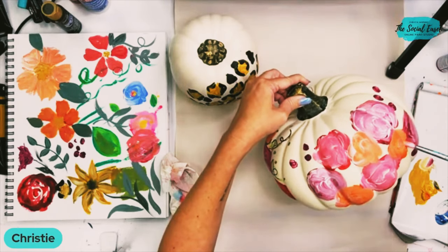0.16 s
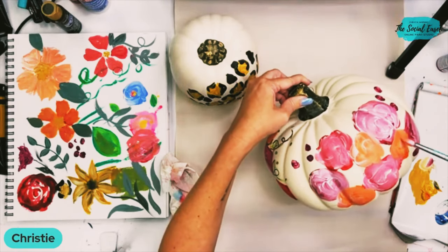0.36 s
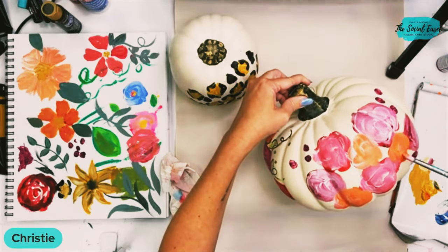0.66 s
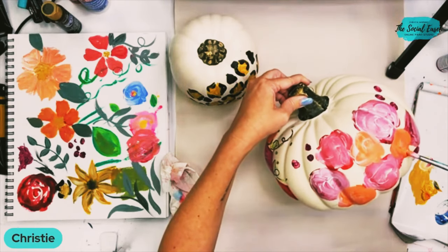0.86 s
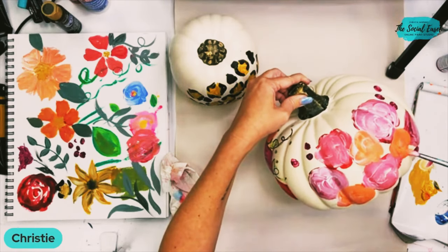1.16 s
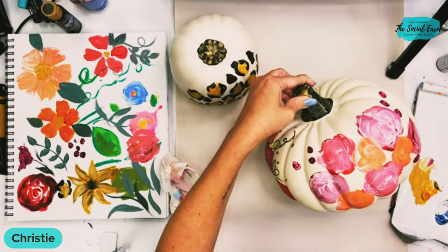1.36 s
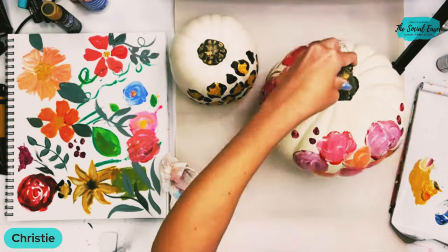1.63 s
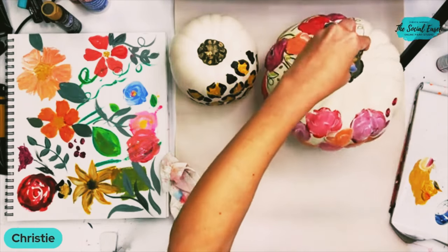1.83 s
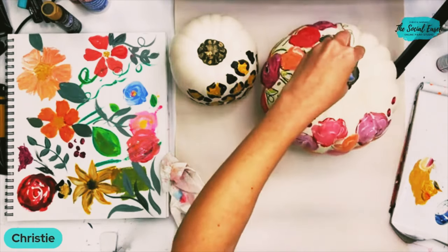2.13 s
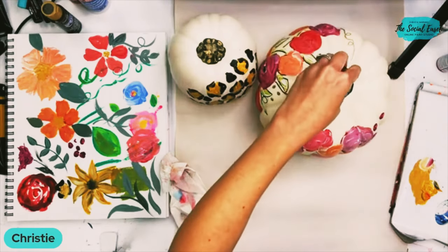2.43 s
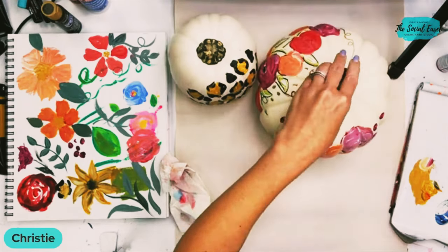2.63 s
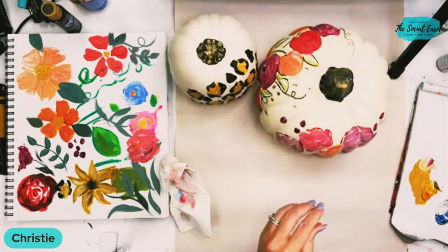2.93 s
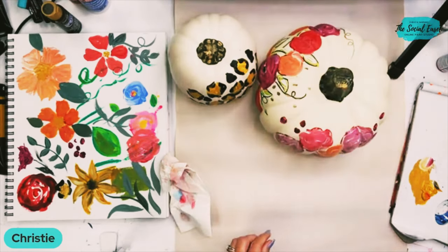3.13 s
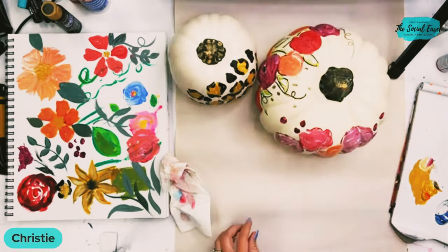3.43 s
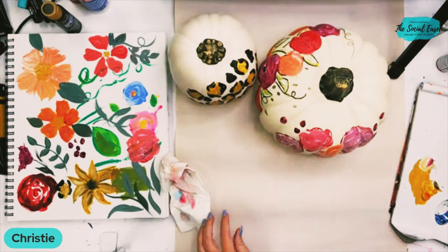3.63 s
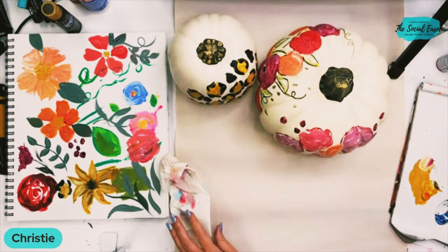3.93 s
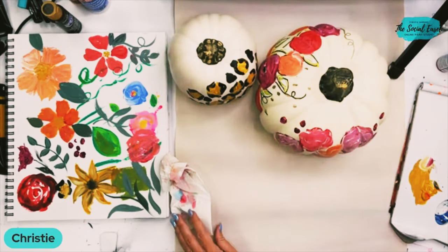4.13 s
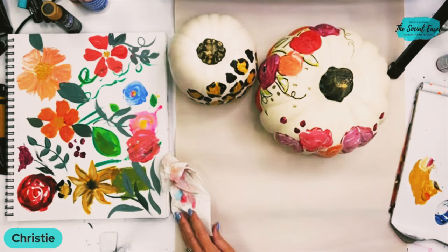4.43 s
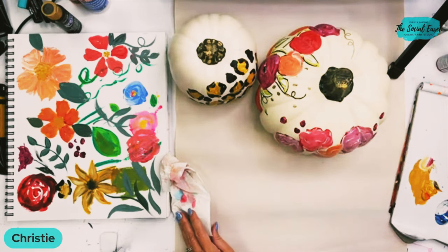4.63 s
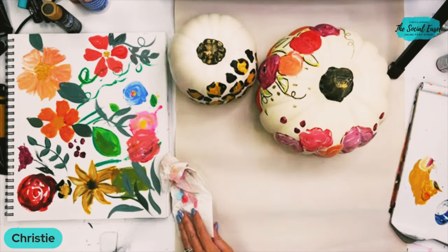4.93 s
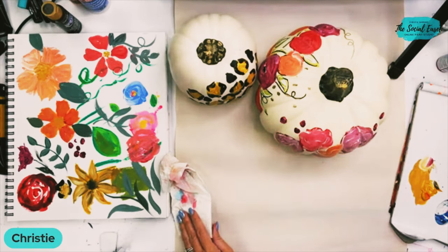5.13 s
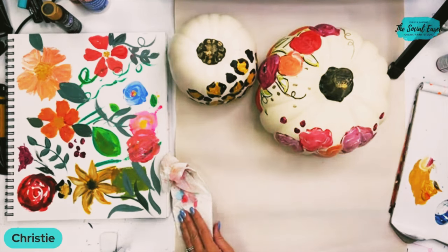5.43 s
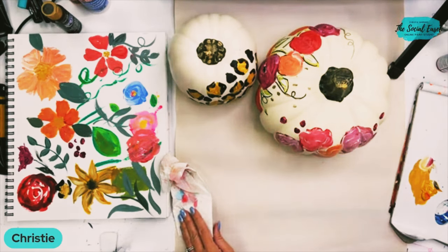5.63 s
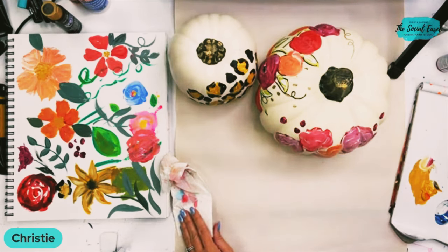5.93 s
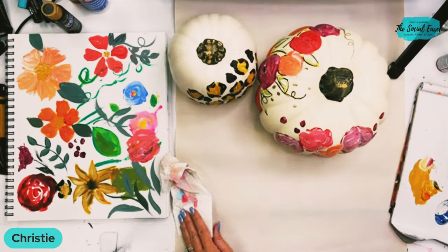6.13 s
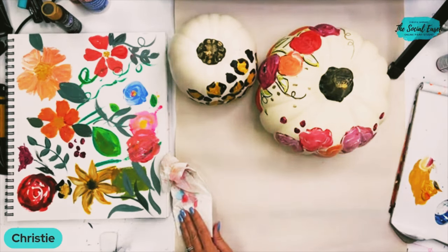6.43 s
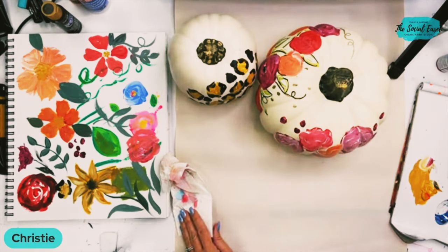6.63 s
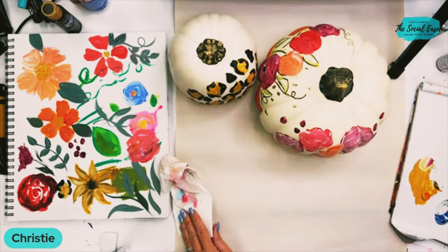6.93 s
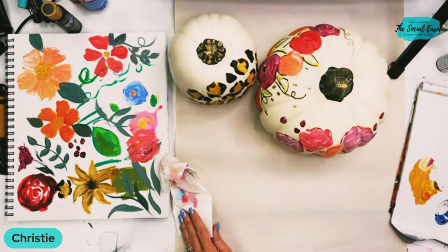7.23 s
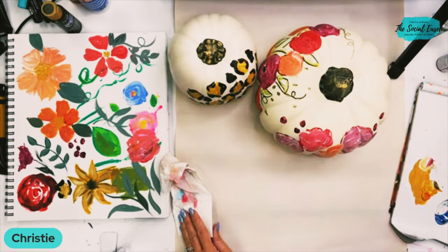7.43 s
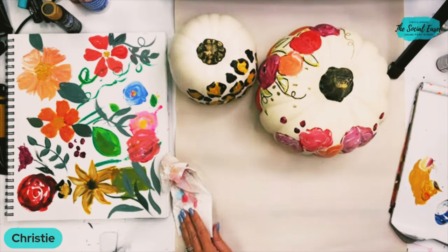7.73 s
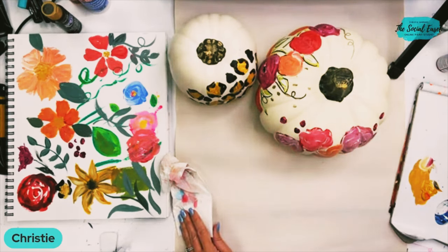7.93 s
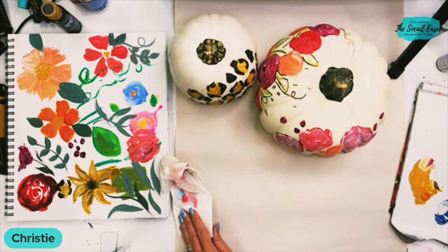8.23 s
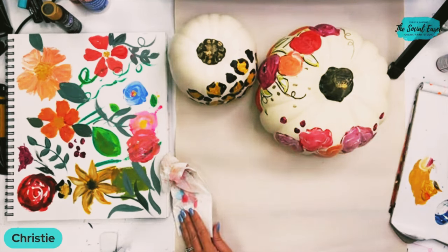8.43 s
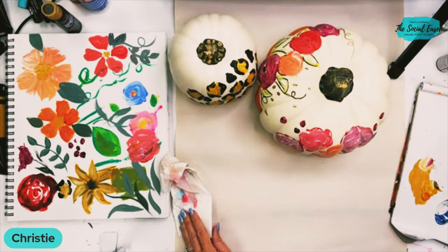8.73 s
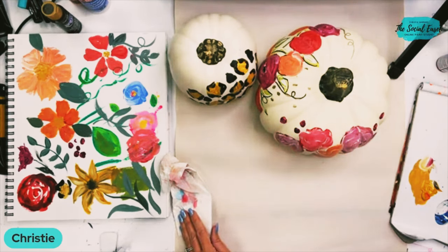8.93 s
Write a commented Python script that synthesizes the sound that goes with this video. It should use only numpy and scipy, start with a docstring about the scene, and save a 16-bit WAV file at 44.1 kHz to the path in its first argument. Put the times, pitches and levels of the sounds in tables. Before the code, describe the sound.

Close in a small quiet room with faint appliance hum, a short dry scrape comes first, then a hollow craft pumpkin rubs over paper and knocks on the table. After a brief gap, a paintbrush is rinsed in a glass jar: quick bright clinks, bubbly plops and light sloshing, busiest at first, then sparser taps until the end.

```python
"""A low appliance hum and a thin lamp whine sit in quiet room air: slowly wavering sines over shaped noise.
A short scrape on a hard edge follows, then a hollow craft pumpkin slides over paper and knocks on a table:
rough filtered noise and decaying shell modes. Then a paintbrush is swished in a water-filled glass jar:
its ferrule clinks as chattering noise bursts, bubbles plop as damped tones, water sloshes as lumpy noise,
and the wet wall sings in fluttering notes. A small room answers with decaying noise tails."""
import sys
import numpy as np
from scipy import signal
from scipy.fft import rfft, irfft, next_fast_len
from scipy.io import wavfile
from scipy.ndimage import uniform_filter1d, map_coordinates

SR = 44100
rng = np.random.default_rng(int(sys.argv[2]) if len(sys.argv) > 2 else 0)


def unload_audio(sound):
    """Save the sound as a 16-bit wav file, at the path given as the first command line argument."""
    columns = np.transpose(np.atleast_2d(sound))
    # keep every value between -1 and 1, then stretch to whole-number steps
    steps = np.round(np.clip(columns, -1, 1) * 32767)
    wavfile.write(sys.argv[1], SR, steps.astype(np.int16))


N = 400428  # length in samples


def amp(db):
    """Decibels to gain."""
    return 10 ** (np.asarray(db) / 20)


def unit(x):
    """Scaled to rms 1."""
    return x / np.sqrt(np.mean(x ** 2) + 1e-20)


def along(points, hz):
    """Values of (freq_hz, value) points, read on a log frequency axis."""
    f, v = np.transpose(points)
    return np.interp(np.log(hz + 1), np.log(f + 1), v)


def curves(rows):
    """One value per sample for each dB column, -120 dB outside the table."""
    s, *cols = np.transpose(rows)
    return [np.interp(np.arange(N) / SR, s, c, -120, -120) for c in cols]


def wobble(rate):
    """A smooth random curve, rate knots a second."""
    return map_coordinates(rng.standard_normal(int(N * rate / SR) + 4), [np.arange(N) * rate / SR])


def filtered(x, response):
    """x shaped by a complex response of frequency."""
    m = next_fast_len(len(x) + len(x) // 16 + 2048)  # spare room for ringing
    return irfft(rfft(x, m) * response(np.fft.rfftfreq(m, 1 / SR)), m)[:len(x)]


def band(hz, width_hz):
    """A causal resonance."""
    return lambda f: 1j * f * width_hz / (hz * hz - f * f + 1j * f * width_hz)


def steep(hz, width_hz):
    """A resonance with fast-falling skirts."""
    return lambda f: band(hz, width_hz)(f) * band(hz, 3 * width_hz)(f)


def puff(size, hz, width_hz):
    """Noise in a steep band, rms 1."""
    return unit(filtered(rng.standard_normal(size), steep(hz, width_hz)))


def add(track, s, sound):
    """Mix a sound in at s seconds."""
    part = track[round(s * SR):][:len(sound)]
    part += sound[:len(part)]


def ringing(modes, t, spread_db):
    """Decaying modes of a struck body, their strengths scattered by spread_db."""
    return sum(amp(db + rng.normal(0, spread_db) - 60 * t / t60) * np.sin(2 * np.pi * hz * t)
               for hz, db, t60 in modes)


def stirred(over_db, t60):
    """A gain of one plus a dying burst after every contact, over_db above the contact's level."""
    t, out = np.arange(SR // 2) / SR, np.ones(N)
    for s, db, *_ in BRUSH_TAPS:
        add(out, s, amp(db + over_db - 60 * t / t60))
    return out


# Colour of the room air: freq_hz [Hz], gain_db [dB, relative]
AIR_COLOUR = [(15, -37.5), (25, -12), (82, -21), (96, -14.5), (118, -4.5), (146, -10), (232, -14.5),
              (343, -16.5), (411, -22.5), (622, -26), (895, -27.5), (1320, -33), (7690, -50), (10200, -44),
              (12300, -71.5), (16000, -103), (22000, -120)]
# Appliance hum, its overtones and the lamp whine: pitch_hz [Hz], level_db [dB rms]
HUM_TONES = [(58.3, -81), (116.54, -63), (120.01, -66), (240, -69), (640.6, -77), (10055, -83.5)]
AIR_DB = -60
BEAT_LEAD_S = .053  # before drift, the tones' phases line up this long before the start


def background():
    """Room air, two close hums that beat, their overtones and a thin whine, all gently wavering."""
    t = np.arange(N) / SR + BEAT_LEAD_S
    air = unit(filtered(rng.standard_normal(N), lambda f: amp(along(AIR_COLOUR, f))))
    tones = sum(amp(db + 3 + 0.61 * wobble(1.6)) * np.sin(2 * np.pi * hz * t + 0.27 * wobble(2.4))
                for hz, db in HUM_TONES)  # +3 dB turns rms into sine peak
    return amp(AIR_DB + 0.18 * wobble(2.5)) * air + tones


# Decay of the small room: freq_hz [Hz], t60_s [s]
ROOM_DECAY = [(300, 0.27), (2000, 0.29), (6000, 0.18), (11000, 0.22)]


def room(x):
    """Reflections arrive after a short gap, each frequency dying at its own speed."""
    out, step = np.zeros(N), SR // 3
    for start in range(0, N, step):  # a new tail every third of a second
        hz, t, z = signal.stft(rng.standard_normal(SR // 3), SR, nperseg=256)
        decay = amp(-60 * t / along(ROOM_DECAY, hz)[:, None])
        tail = signal.istft(z * decay, SR, nperseg=256)[1]
        reflections = signal.fftconvolve(x[start:start + step], tail / np.linalg.norm(tail))
        add(out, start / SR + .015, reflections)
    return out


# Stroke of the short scrape: time_s [s], level_db [dB rms]
SCRAPE_STROKE = [(1.35, -72), (1.37, -61), (1.373, -56.5), (1.385, -49.5), (1.415, -53), (1.432, -61),
                 (1.445, -77)]
# Resonances of the hard edge: pitch_hz [Hz], width_hz [Hz], gain_db [dB, relative]
EDGE_MODES = [(2360, 300, -4.5), (3260, 280, -1), (4300, 1200, -3.5), (6600, 1000, -6), (8800, 2000, -21)]


def scrape():
    """A catch on a hard edge, then coarse grains through its resonances."""
    grains = rng.standard_normal(N) * amp(4 * wobble(400))
    edge = lambda f: sum(amp(db) * steep(hz, w)(f) for hz, w, db in EDGE_MODES)
    out = amp(curves(SCRAPE_STROKE)[0]) * unit(filtered(grains, edge))
    t = np.arange(SR // 30) / SR
    catch = ringing([(hz, 0, .025) for hz, *_ in EDGE_MODES[:2]], t, spread_db=6)
    add(out, SCRAPE_STROKE[2][0], amp(-44) * catch)
    return out


# Pumpkin and hand on the table: start_s [s], level_db [dB]; within each knock shell_db [dB],
# note_hz [Hz], note_db [dB], click_db [dB, before a 5 dB cut], click_hz [Hz]
TABLE_KNOCKS = [(1.796, -51, -10, 1310, -4, 14, 3520), (2.002, -49, -15, 1070, 2.5, -7, 2260),
                (2.067, -31, -6, 1150, -1, -44, 2010), (2.368, -32.5, -12.5, 1060, -21, 10.5, 3120),
                (2.424, -22, 0.5, 1410, -5.5, -11, 3930), (2.574, -31, -11.5, 1360, -4, -17, 4300),
                (2.594, -32.5, -16, 1380, -6, -11.5, 2160)]
# Modes of pumpkin and table top: pitch_hz [Hz], level_db [dB, relative], t60_s [s]
SHELL_MODES = [(120, -9.5, 0.17), (166, -2, 0.11), (212, 0, 0.077), (253, 3, 0.063), (333, -9.5, 0.08),
               (549, -13.5, 0.11), (657, -5.5, 0.079), (716, -17.5, 0.12)]
# Strokes over paper, one list each: time_s [s], level_db [dB]
PAPER_SLIDES = [
    [(1.5, -84), (1.6, -72.5), (1.8, -67.5), (1.98, -71), (2.06, -75)],
    [(2.28, -70), (2.35, -69), (2.372, -50), (2.40, -49), (2.424, -40.5), (2.45, -77)],
]
# Colour of rubbed paper: freq_hz [Hz], gain_db [dB, relative]
PAPER_COLOUR = [(530, -38), (900, -15), (1700, -7), (2490, 0.5), (2960, -3), (4110, 0.5), (4540, -2),
                (6370, -10), (9340, -10), (11000, -26.5), (12300, -13.5), (16000, -68), (22000, -120)]


def pumpkin():
    """The hollow shell knocks softly on the table and rubs across paper in small grains."""
    out, t = np.zeros(N), np.arange(SR // 4) / SR
    for s, db, shell_db, hz, note_db, click_db, click_hz in TABLE_KNOCKS:
        thud = amp(shell_db) * ringing(SHELL_MODES, t, spread_db=0.0)
        thud = thud + amp(-6.5 - 60 * t / 0.056) * puff(len(t), 565, 155)
        note = puff(len(t), hz, 140) + amp(-14.5) * puff(len(t), 1.68 * hz, 120)
        note = amp(note_db - 60 * t / 0.022) * note
        click = amp(click_db - 60 * t / 0.019) * puff(len(t), click_hz, 590)
        soft_onset = 1 - np.exp(-t / 0.0024)
        add(out, s, amp(db) * soft_onset * (thud + note) + amp(db - 5) * click)
    knocks = filtered(out, lambda f: (1j * f / (85 + 1j * f)) ** 2)  # bass cut
    stroke = sum(amp(curves(slide)[0]) for slide in PAPER_SLIDES)
    grains = rng.standard_normal(N) * amp(1.2 * wobble(300))
    return knocks + stroke * unit(filtered(grains, lambda f: amp(along(PAPER_COLOUR, f))))


# Water in motion: time_s [s], gurgle_db [dB, bubble crowd], fizz_db [dB, before splash bursts]
WATER_MOTION = [(3.0, -83, -102), (3.3, -92, -66.5), (3.5, -62, -75.5), (3.95, -51, -71), (4.4, -71.5, -72),
                (4.78, -57, -76), (5.12, -56, -67), (5.3, -74, -85.5), (5.75, -80.5, -70),
                (6.05, -69, -71.5), (6.6, -89, -81.5), (7.9, -69, -82.5), (8.15, -65, -79.5),
                (8.9, -84, -83.5), (9.08, -94, -77)]
SPLASH_DB, SETTLE_S = 59.5, 0.07  # splash over a contact's level; its t60


def fizz():
    """Rough splashy wash: noise in small lumps, thrown up by each contact and settling."""
    lumps = amp(2.5 * wobble(150) + 2.5 * wobble(30))
    wash = filtered(puff(N, 3100, 4100), band(4400, 4000)) + amp(-16.5) * puff(N, 10000, 1100)
    return amp(curves(WATER_MOTION)[1]) * stirred(SPLASH_DB, SETTLE_S) * unit(lumps * wash)


# Wall notes that droplets sound: pitch_hz [Hz], gain_db [dB, relative]
SPRAYED_NOTES = [(2255, -7.5), (2420, 0.5), (2750, 4.5), (4340, -3.5)]
DROPS_DB = 7.5  # over the fizz curve


def droplets():
    """Tiny drops thrown against the wall keep its blurred notes flickering, most after a contact."""
    drops = rng.standard_normal(N) * amp(7.4 * wobble(60))
    wall = lambda f: sum(amp(db) * steep(hz, hz / 28)(f) for hz, db in SPRAYED_NOTES)
    return amp(curves(WATER_MOTION)[1] + DROPS_DB) * stirred(36, .3) * unit(filtered(drops, wall))


def bubble(t, hz, t60, rise):
    """A damped tone; with positive rise its pitch climbs as the pocket nears the surface, else it sags."""
    swell = amp(-60 * t / t60) * (1 - np.exp(-t / 0.0016)) ** 2
    return swell * np.sin(2 * np.pi * hz * (t + rise * t * t / t60))


# Air pockets closing behind the brush: start_s [s], level_db [dB], pitch_hz [Hz, at the start]
PLOPS = [(3.245, -41, 1428), (3.266, -25.5, 1550), (3.405, -39, 1580), (3.426, -34.5, 1474),
         (3.494, -24, 1229), (3.595, -38.5, 1250), (3.639, -44, 1240), (3.67, -28.5, 1387),
         (3.718, -49, 1800), (3.747, -15, 920), (3.745, -18.5, 1312), (3.776, -29, 1660), (3.896, -8, 1277),
         (4.023, -15.5, 1396), (4.065, -31, 1277), (4.125, -29, 1700), (4.214, -23.5, 1497),
         (4.283, -30.5, 1496), (4.353, -28.5, 1278), (4.371, -16, 1390), (4.51, -41.5, 1520),
         (4.617, -39.5, 1000), (4.647, -42, 1010), (4.67, -52, 970), (4.697, -28, 1610),
         (4.702, -25.5, 1264), (4.724, -27.5, 1500), (4.779, -30.5, 1656), (4.815, -38, 920),
         (4.83, -41, 920), (4.879, -24.5, 1348), (4.941, -41, 1640), (4.957, -37, 1303), (5.005, -40, 1670),
         (5.053, -19, 1385), (5.187, -38.5, 2115), (5.505, -25.5, 1610), (5.571, -41, 1433),
         (5.66, -31.5, 1432), (5.673, -29, 1830), (5.732, -36, 1666), (5.776, -41, 1940),
         (5.805, -32, 1740), (5.845, -50, 1700), (5.869, -28, 1382), (5.943, -33.5, 1830),
         (6.089, -25, 1630), (6.162, -30, 1473), (6.235, -44, 1060), (6.444, -37, 1926),
         (6.654, -48.5, 1360), (7.036, -30, 1776), (7.043, -27.5, 1453), (7.385, -41, 1636),
         (7.473, -46.5, 1375), (7.536, -44, 1840), (7.61, -41.5, 1500), (7.629, -31, 1360),
         (7.699, -30.5, 1417), (7.928, -47, 1620), (7.97, -38.5, 1590), (8.003, -43, 977),
         (8.096, -30, 1448), (8.133, -41, 1510), (8.446, -27.5, 1390), (8.509, -35, 1278),
         (8.523, -38.5, 1323)]
# The largest air pocket: time_s [s], pitch_hz [Hz]
LARGEST_POCKET = [(3.3, 1470), (3.5, 1170), (3.73, 1270), (3.76, 894), (4.12, 966), (4.2, 1262), (9, 1272)]
PLOP_T60_S, SHORTER_DB_PER_DB = 0.057, 0.17  # ring of a -36.5 dB plop; a harder one bursts sooner
# climb per dB of strength over -36 dB and unit of relative pitch above STILL_HZ; lower notes hold
GLIDE, STILL_HZ = 0.056, 1164


def bubbles():
    """Clear plops, and a crowd of small blunt ones that follows the sloshing."""
    out, crowd, t = np.zeros(N), np.zeros(N), np.arange(SR // 6) / SR
    for s, db, hz in PLOPS:
        flutter = amp(5.24 * puff(len(t), 100, 49))
        t60 = PLOP_T60_S * amp(-SHORTER_DB_PER_DB * (db + 36.5))
        rise = GLIDE * max(hz / STILL_HZ - 1, 0) * max(db + 36, 0)
        add(out, s, amp(db) * flutter * bubble(t, hz, t60, rise))
    for when, pitch, size, bend in rng.uniform(0, 1, (1100, 4)):
        s = 3 + when * (N / SR - 3)
        # most sound near the largest pocket's note
        hz = np.interp(s, *np.transpose(LARGEST_POCKET)) * amp(5 * pitch ** 4)
        blunt = bubble(t[:1500], hz, 55 / hz, rise=.06 * (bend - .3))
        add(crowd, s, amp(-2.2 * np.log(size)) * blunt)
    gurgle = amp(curves(WATER_MOTION)[0]) * unit(crowd)
    # the narrow jar radiates no bass
    return filtered(out + gurgle, lambda f: 1 / (1 + (780 / (f + 1)) ** 6))


# Modes of jar wall and the air above the water: pitch_hz [Hz], width_hz [Hz], gain_db [dB, relative]
JAR_MODES = [(927, 1.9, 11), (1184, 24, 13), (2210, 6.3, 2), (2448, 40, 11), (2680, 8.9, 2.5),
             (4328, 150, 12.5), (6700, 360, 2.5), (8880, 300, -14.5)]


def glass(x):
    """The jar wall rings at its modes with whatever strikes or washes it."""
    return filtered(x, lambda f: sum((-1) ** k * amp(db) * band(hz, w)(f)
                                     for k, (hz, w, db) in enumerate(JAR_MODES)))


# Notes of the wet glass wall, set off by water and bristles: pitch_hz [Hz], then a list of
# start_s [s], level_db [dB], t60_s [s, held within 0.015 to 0.4 when played]
WALL_NOTES = [(1245, [(3.54, -40, 0.14), (3.912, -30.5, 0.12), (3.94, -36, 0.15), (4.13, -43, .1),
              (8.556, -52, 0.24)]), (2273, [(3.27, -53, 0.43), (5.205, -51.5, 0.24), (6.965, -49.5, 0.29),
              (7.15, -57, 0.11)]), (2416, [(3.331, -32, 0.028), (3.49, -41.5, 0.073), (3.644, -35, 0.031),
              (3.677, -28.5, 0.046), (4.135, -42, 0.15), (4.964, -35.5, 0.053), (5.3, -43.5, 0.099),
              (5.924, -26, 0.039), (5.97, -29.5, 0.031), (5.99, -48, 0.22), (6.026, -43.5, 0.1),
              (6.052, -34, 0.032), (6.106, -36, 0.17), (6.523, -33.5, 0.064), (6.545, -58, 0.11),
              (6.761, -46, 0.21), (6.818, -52, 0.16), (8.628, -49, 0.083), (8.67, -37, 0.04),
              (8.732, -41.5, 0.11)]), (2630, [(6.307, -35, 0.038)]), (2740, [(3.105, -57, 0.15),
              (3.308, -48, 0.085), (3.52, -58, 0.13), (4.07, -42.5, 0.14), (3.417, -42, 0.059),
              (3.607, -46, 0.049), (4.42, -48, 0.45), (4.506, -49, 0.33), (4.541, -50, 0.22),
              (4.912, -41, .03), (5.054, -38.5, 0.23), (7.63, -31, 0.032), (8.133, -37.5, 0.099),
              (8.3, -45, 0.026), (8.857, -35, 0.08)]), (2990, [(4.806, -38.5, 0.081), (5.735, -29, 0.05),
              (5.945, -37, 0.08), (6.236, -17, 0.014), (7.123, -17, 0.021), (7.14, -59, 0.17),
              (7.288, -23.5, 0.028), (7.475, -36.5, 0.029), (7.535, -43, 0.072), (9.018, -46, 0.1)]),
              (3920, [(4.808, -40, 0.052), (6.446, -38.5, 0.048)]), (4900, [(4.215, -23, 0.036),
              (4.24, -57, .25)]), (4320, [(3.104, -48.5, 0.28), (3.13, -53, 0.16), (3.76, -51, 0.28),
              (3.83, -57, 0.33), (4.39, -44, 0.15), (4.5, -53, 0.16), (4.735, -39.5, 0.15),
              (5.06, -49, 0.16), (7.773, -38, 0.028), (6.117, -47, 0.074), (7.958, -31, 0.029),
              (9.046, -47.5, 0.073)]), (4880, [(6.39, -45, 0.24), (6.812, -52, 0.32), (8.005, -14, 0.016),
              (8.03, -50, 0.23)]), (5806, [(3.445, -49, 0.097), (3.511, -41.5, 0.025),
              (3.617, -20.5, 0.028), (3.647, -46, 0.082), (3.677, -33, 0.048), (4.021, -19.5, 0.04),
              (4.668, -47, 0.18), (5.298, -37, 0.04), (5.969, -28, 0.043), (6.022, -46, 0.047),
              (8.67, -56.5, 0.063)]), (5490, [(7.592, -38, 0.026), (8.31, -42, 0.031), (9.015, -6, 0.018)]),
              (6445, [(3.097, -41, 0.021), (4.214, -26, 0.03), (6.093, -14, 0.016), (6.236, -34, 0.027),
              (6.374, -50, 0.044), (7.91, -29, 0.023), (7.957, -30, 0.022), (7.046, -51.5, .025)]),
              (8670, [(4.524, -37.5, 0.092), (8.004, -26.5, 0.04)])]
WANDER = 0.013  # the moving waterline shakes a note by this share of its pitch, rms


def pings():
    """One mode at a time, fluttering in strength and pitch as the water level moves along the wall."""
    out, t = np.zeros(N), np.arange(SR // 5) / SR
    for hz, notes in WALL_NOTES:
        for s, db, t60 in notes:
            flutter = amp(2.3 * puff(len(t), 60, 88))
            shake = np.cumsum(WANDER * puff(len(t), 70, 120)) / SR
            swell = amp(-60 * t / np.clip(t60, .015, .4)) * (1 - np.exp(-t / 0.0013)) ** 2
            add(out, s, amp(db) * flutter * swell * np.sin(2 * np.pi * hz * (t + shake)))
    return out


# grazes over the fizz curve; their burst over a contact's level; its t60
TICKS_DB, RATTLE_DB, RATTLE_S = 2.5, 51.5, 0.16


def ticks():
    """The brush grazes the glass: dense dull scratches in their own bands, swelling after each contact."""
    out, t = np.zeros(N), np.arange(SR // 80) / SR
    for when, size, note in rng.uniform(0, 1, (700, 3)):
        scratch = amp(-60 * t / 0.028) * puff(len(t), 1800 * amp(9.7 * note), 800)
        add(out, 3.1 + when * (N / SR - 3.1), amp(-2.5 * np.log(size)) * scratch)
    return amp(curves(WATER_MOTION)[1] + TICKS_DB) * stirred(RATTLE_DB, RATTLE_S) * unit(out)


# Brush on glass: start_s [s], level_db [dB, short-term peak], pitch_hz [Hz, contact note],
# treble_db [dB, before halving]
BRUSH_TAPS = [(3.0976, -29, 6250, 3), (3.2469, -27, 4200, 9), (3.4034, -37.5, 6540, 1),
              (3.418, -40, 4840, 7), (3.432, -40, 4670, 1), (3.596, -29, 5630, 8), (3.606, -33, 5600, 10),
              (3.674, -42.5, 5660, -13), (3.738, -45.5, 3360, 1), (3.7472, -25, 5630, 9),
              (3.894, -28.5, 4600, 0), (3.908, -31, 5100, -0.5), (3.939, -43, 4400, 21.5),
              (3.977, -42.5, 3740, 3), (3.989, -48, 3570, 5), (4.021, -28.5, 4760, -6),
              (4.064, -49, 2700, -20), (4.09, -55, 2900, -13), (4.137, -49.5, 2500, -20),
              (4.214, -18.5, 4480, -6), (4.354, -29.5, 6000, -18), (4.373, -28.5, 2980, 5.5),
              (4.4858, -20, 4720, 11), (4.7062, -37, 5700, -24), (4.668, -52.5, 5030, -24),
              (4.7231, -20, 5800, 9), (4.742, -52, 4540, -14.5), (4.781, -32.5, 6940, 20),
              (4.81, -48, 4050, 5), (4.959, -61, 5500, -28), (4.972, -49.5, 6170, -33),
              (4.989, -49, 4600, -20), (5.005, -37, 4300, 4), (5.052, -29, 4900, 4.5),
              (5.075, -47.5, 4280, -8), (5.105, -54, 3100, -10), (5.188, -40.5, 5150, -39),
              (5.5066, -20.5, 5620, -4.5), (5.574, -40.5, 3030, -21), (5.6589, -21.5, 5230, -2),
              (5.7767, -35, 3760, -4), (5.8021, -19, 4620, -2), (5.922, -41, 2860, 6),
              (5.9463, -40, 5750, 10), (5.972, -47, 5800, -38), (6.087, -39.5, 6700, -0.5),
              (6.0942, -23.5, 3700, 2), (6.234, -31.5, 5070, 8), (6.374, -27, 6200, -1.5),
              (6.5185, -27.5, 4780, -3), (6.754, -25.5, 4530, 0.5), (6.796, -23.5, 5300, 13.5),
              (6.9577, -41.5, 2660, -28.5), (7.0382, -35, 4120, -26), (7.0459, -32, 6360, 0),
              (7.11, -45, 4270, 8), (7.1212, -30.5, 2990, 6.5), (7.2878, -30, 6340, 0),
              (7.414, -59, 5860, 3), (7.472, -38, 4820, -3), (7.5353, -39.5, 6840, -33),
              (7.63, -29.5, 4660, 4.5), (7.774, -48.5, 6560, 3), (7.9085, -36, 5150, -2),
              (7.931, -43, 5430, -3), (7.957, -44.5, 4740, -1), (7.994, -56, 4220, -23),
              (8.0027, -30.5, 5600, 14), (8.125, -42, 4660, -12), (8.1373, -39.5, 5100, 0),
              (8.309, -47.5, 5540, 12), (8.391, -65, 5360, -13), (8.5104, -41.5, 4030, -39),
              (8.5246, -37, 3660, -38.5), (8.8574, -35, 3560, -14.5), (9.0113, -29.5, 5440, -1)]
LOW_CLINK_DB = -9.5  # the jar's low clink under every contact note


def taps():
    """A faint noise swell leads into a chattering crack, each coloured by random short resonances."""
    out, t, lead = np.zeros(N), np.arange(SR // 12) / SR, .008
    after = np.maximum(t - lead, 0)
    decay = amp(-60 * after / 0.0046) + amp(-10.0 - 60 * after / 0.037)
    blow = (1 - np.exp(-after / 0.00051)) * decay
    lead_in = amp(-18.0) * (t / lead) ** 2 * (t < lead + .001)
    for s, db, hz, treble_db in BRUSH_TAPS:
        shape = lead_in + blow * amp(2.64 * puff(len(t), 248, 270))  # the ferrule chatters
        resonance_hz = 2500 * amp(13 * rng.uniform(0, 1, 11))

        def colours(f):
            """Contact note, treble and low clink."""
            treble = steep(8800, 1100)(f) + amp(-9.5) * steep(11000, 2500)(f)
            low_clink = amp(LOW_CLINK_DB) * steep(2850, 600)(f)
            return steep(hz, 700)(f) + amp(treble_db) / 2 * treble + low_clink

        resonances = lambda f: amp(-3) + sum(band(mode_hz, 260)(f) for mode_hz in resonance_hz)
        crack = filtered(shape * rng.standard_normal(len(t)), lambda f: colours(f) * resonances(f))
        peak = np.sqrt(uniform_filter1d(crack ** 2, size=66).max())  # loudest 1.5 ms
        add(out, s - lead, amp(db) * crack / peak)
    return out


def scene():
    """Everything on the table, its reflections, the unreflected scrape and the background."""
    blows, wash, plops = taps() + ticks(), fizz(), bubbles() + droplets()
    wall = amp(-3.5) * glass(blows + amp(1.0) * wash + amp(-7.0) * plops)
    table = blows + wash + plops + wall + pings() + pumpkin()
    return (table + amp(-17.0) * room(table) + scrape() + background())[None]


# Microphone response: freq_hz [Hz], gain_db [dB]
MIC_RESPONSE = [(30, -14.5), (70, 0), (110, -1), (11500, -2), (12400, -30.5), (15000, -16.5)]
TOP_HZ = 15700  # band limit


def record(dry):
    """The microphone thins deep bass and top treble and keeps nothing above its band limit."""
    return filtered(dry[0], lambda f: amp(along(MIC_RESPONSE, f)) * (f < TOP_HZ))[None]


dry = scene()
out = record(dry)
unload_audio(out)
```